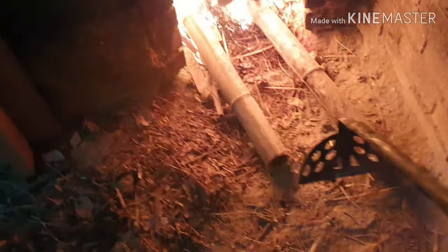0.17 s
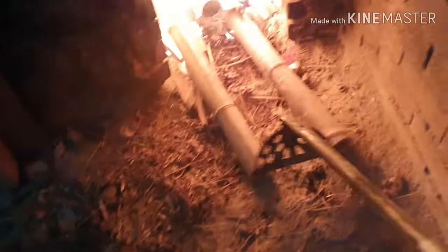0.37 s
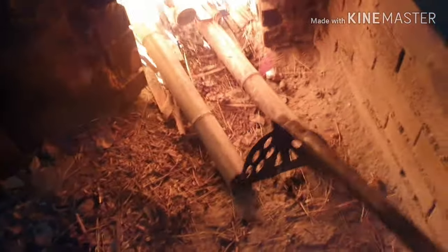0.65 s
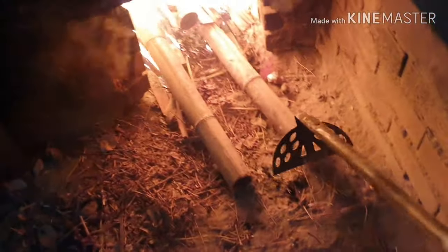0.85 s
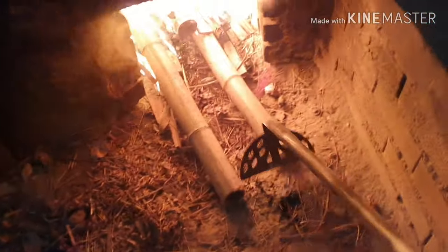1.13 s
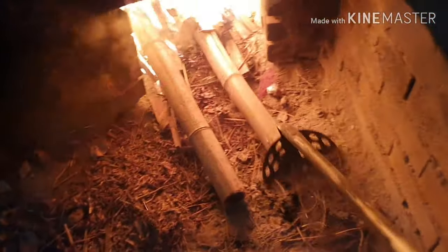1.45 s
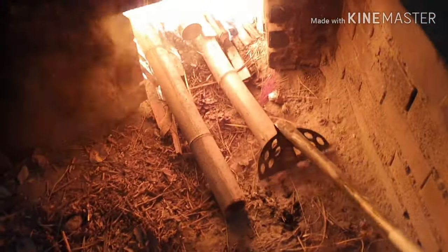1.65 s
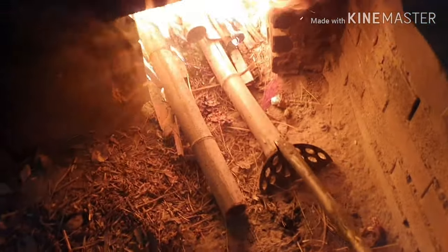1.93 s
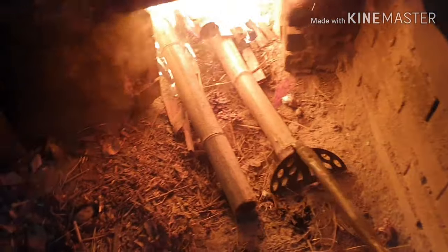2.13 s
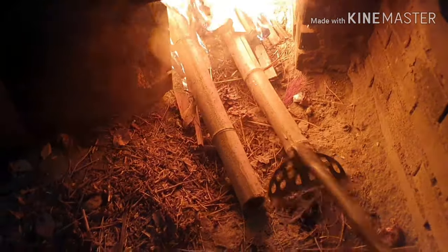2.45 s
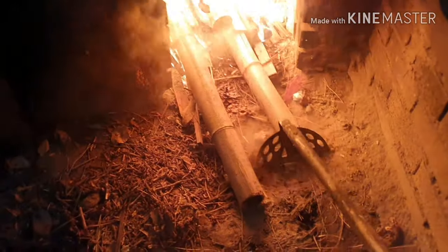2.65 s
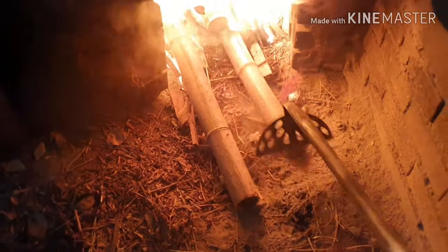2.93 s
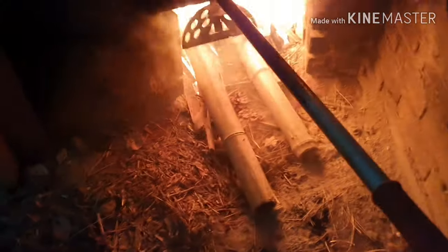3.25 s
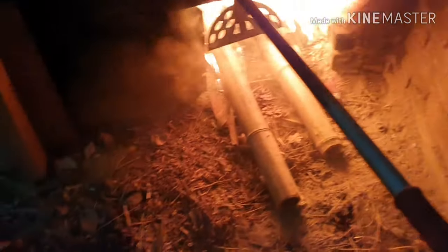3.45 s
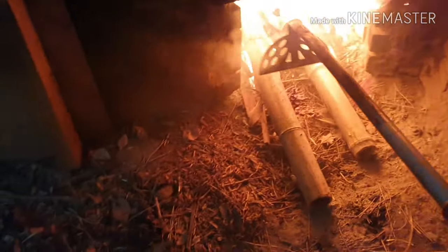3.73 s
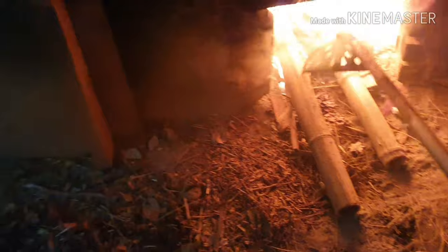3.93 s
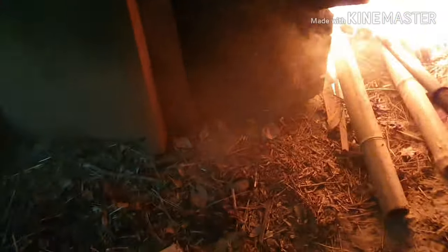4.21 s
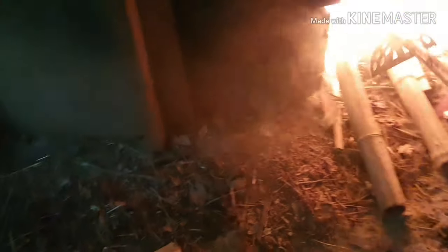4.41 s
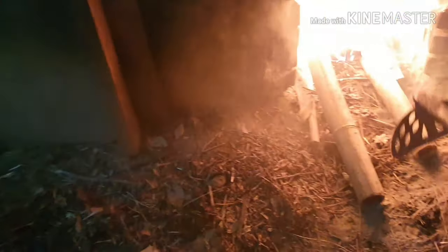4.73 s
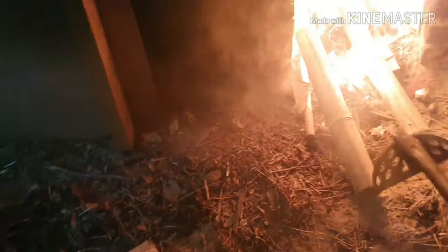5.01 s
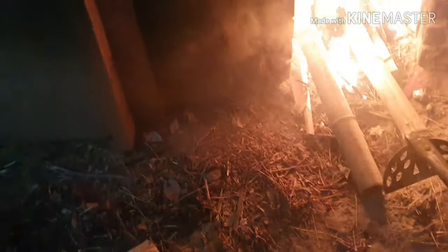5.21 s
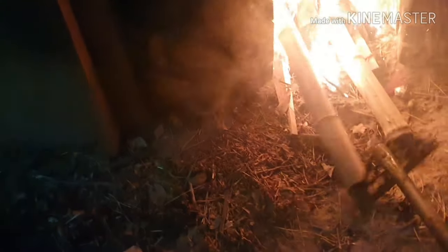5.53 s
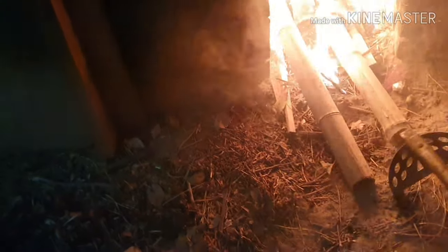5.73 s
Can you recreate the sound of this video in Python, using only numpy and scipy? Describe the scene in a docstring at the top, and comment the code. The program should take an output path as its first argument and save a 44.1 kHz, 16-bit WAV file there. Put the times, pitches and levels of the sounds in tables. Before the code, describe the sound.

Bamboo poles burning in a brick firebox crack and pop sharply at irregular moments, with hollow knocks, over low fluttering flames and faint hissing steam.

```python
"""Bamboo poles burn in the mouth of a brick firebox while an iron rake shoves them in.
The poles crack in clusters of snapping fibres, made of shaped grainy noise coloured by the cane.
Knocked poles hoot and thump low and the rake blade tinkles, all as decaying sines; hard walls answer by convolution.
Underneath, filtered noise gives rumbling flames, hissing steam and fizzing sap, and short noise pulses tick as embers."""
import sys
import numpy as np
from scipy import signal
from scipy.fft import rfft, irfft, next_fast_len
from scipy.io import wavfile
from scipy.ndimage import uniform_filter1d

SR = 44100
rng = np.random.default_rng(int(sys.argv[2]) if len(sys.argv) > 2 else 0)


def generate_wav(signal):
    """Clip the signal to [-1, 1] and save it as 16-bit WAV at the path in sys.argv[1]."""
    frames = np.transpose(np.atleast_2d(signal))
    scaled = np.clip(frames, -1, 1) * 32767
    pcm = np.round(scaled).astype(np.int16)
    wavfile.write(sys.argv[1], SR, pcm)


N = 258426
TIME = np.arange(N) / SR  # s
# likeness of left and right at the microphones: pitch_hz, correlation (-1 to 1)
LIKENESS = [(25, 0.7), (60, 1), (150, 0.96), (280, 0.88), (550, 0.73), (1100, 0), (2200, 0.059), (16000, 0)]


def cracks():
    """Splitting poles: each crack is a dense burst of fibre snaps."""
    # cracks of the poles: start_s, swell_s (time scale), level_db, pitch_hz (of the splitting cane),
    # treble_fall_db_per_octave
    crack_rows = [(.2662, .009, -12.5, 1134, 9.5), (.2887, .0038, -21, 2600, 4),
                  (.3057, .015, -21, 1200, 7.5), (.3284, .0056, -19, 1650, 3.5),
                  (.8975, .0053, -7, 1233, 7.2), (.9172, .021, -25, 806, 3.5),
                  (.9553, .0032, -15.5, 810, 3), (1.0028, .006, -23, 835, 3.5),
                  (1.2519, .0026, -17.5, 10000, 0), (1.441, .0059, -13.5, 1520, 4),
                  (1.4496, .0088, -14.5, 3300, 0.5), (1.4806, .0094, -13, 1080, 7.5),
                  (1.5194, .0086, -23, 1020, 1.5), (1.8115, .005, -38.5, 1100, 1.5),
                  (2.4874, .009, -25, 1410, 2.5), (2.5124, .0059, -11.5, 1630, 4),
                  (2.5328, .0066, -12, 1035, 7), (2.9865, .005, -8.5, 1090, 5),
                  (3.0175, .0057, -17, 960, 3.5), (3.055, .0091, -29, 4160, 7.5),
                  (3.2632, .0043, -25, 1100, 3.5), (4.036, 0.006, -12.5, 3520, 6.5),
                  (4.037, .02, -17, 665, 6.5), (4.0745, .003, -10.5, 815, 4.5),
                  (4.2874, .0063, -32, 290, 4.5), (4.4809, .0033, -25.5, 550, 9),
                  (4.4938, .0028, -26.5, 1650, 10), (4.8265, .0057, -38, 250, 2.5),
                  (5.063, .0052, -11.5, 1480, 6), (5.531, .004, -10, 1430, 9.5),
                  (5.5451, .015, -18.5, 4500, 2.5)]
    return swarms(crack_rows, softness=0.6, grain_db=5.5, alike=0.33, evenness=0.62)


def scrapes():
    """Drawn-out scrapes and spurts: gentler bursts whose level wavers quickly."""
    # scrapes and spurts: start_s, swell_s (time scale), level_db, pitch_hz, treble_fall_db_per_octave
    scrape_rows = [(1.2531, 0.03, -31.5, 3600, 0), (1.7599, 0.035, -45.5, 890, 4),
                   (1.81, 0.18, -55.5, 10000, -1), (3.5563, .045, -41, 610, 0.15),
                   (3.9179, 0.043, -39, 470, 4), (4.22, 0.068, -53, 7000, -2),
                   (4.49, .023, -39.5, 2800, 5.5), (4.5095, 0.078, -44, 560, 2),
                   (5.497, 0.029, -25.5, 1370, .6)]
    swarm = swarms(scrape_rows, softness=1.0, grain_db=3.0, alike=0.22, evenness=0.46)
    return swarm * from_db(1.64 * drift(rate=150))


def swarms(rows, softness, grain_db, alike, evenness):
    """One burst for each row."""
    out = np.zeros((2, N))
    for start_s, *row in rows:
        add(out, start_s, burst(row, softness, grain_db, alike, evenness))
    return out


def burst(row, softness, grain_db, alike, evenness):
    """A swarm of fibre snaps swells and stops; the pole gives it its colour, strongest near the pitch of the cane."""
    # broad resonances of the poles in the firebox mouth: pitch_hz, level_db (per third octave)
    pole_resonances = [(60, -35), (120, -11), (200, -5.5), (320, -8), (450, -8), (660, -4), (1000, -9.5),
                       (1400, -8), (2200, -6), (4400, -7), (7500, -7), (11000, -5), (16000, -7)]
    usual_air_hz, air_scatter_octaves = 675, 0.15
    swell_s, level_db, pitch_hz, treble_fall = row
    swell_s = max(swell_s, .001)
    size = 2 * next_fast_len(int((2 * swell_s + .03) * SR))

    u = np.arange(size) / SR / swell_s
    shape = (u * u / softness) ** (softness / 2) * np.exp((softness - u * u) / 2)
    grains = from_db(grain_db * np.minimum(rng.exponential(1, size), 5))
    snaps = rfft(shape * rng.standard_normal((2, size)) * grains)
    # a snap has no pitch: its energy is spread fairly evenly over all frequencies
    even_snaps = irfft(snaps / np.abs(snaps) ** min(evenness, 1))
    snaps = rfft(even_snaps * shape ** 0.2)
    snaps = snaps / np.sqrt(np.mean(np.abs(snaps) ** 2, axis=1, keepdims=True))

    hz = np.maximum(np.arange(size // 2 + 1) * SR / size, 10)
    colour = from_db(level_db - skirts_db(hz, pitch_hz, treble_fall) + at_hz(pole_resonances, hz))
    air_hz = usual_air_hz * 2 ** (air_scatter_octaves * rng.normal())
    colour = colour * woody(hz, air_hz, pitch_hz, boost_db=4.5, width=0.05, upper_db=-8)
    # width of a third octave as a share of the whole band
    third_octave = (2 ** (1 / 6) - 2 ** (-1 / 6)) * hz / (SR / 2)
    pair = widen(snaps, np.maximum(alike, at_hz(LIKENESS, hz)))
    return irfft(pair * causal(colour / np.sqrt(third_octave))) * np.linalg.norm(shape)


def skirts_db(hz, pitch_hz, treble_fall, flat_above_hz=10000):
    """Loss on either side of a burst's pitch, steady per octave; the bass loss has a limit."""
    bass_fall_db_per_octave, bass_limit_db = 8, 23.5
    octaves = np.log2(np.minimum(hz, flat_above_hz) / pitch_hz)
    bass_loss_db = np.minimum(-bass_fall_db_per_octave * octaves, bass_limit_db)
    return np.where(octaves > 0, treble_fall * octaves, bass_loss_db)


def woody(hz, air_hz, wall_hz, boost_db, width, upper_db):
    """Cane favours the pitch of its air column and the bending modes of its wall; the local average stays level."""
    modes = [(air_hz, 0), (wall_hz, 0), (1.54 * wall_hz, upper_db), (3.4 * wall_hz, upper_db)]
    power = 1
    for centre_hz, mode_db in modes:
        power = power + from_db(boost_db + mode_db) ** 2 / (1 + ((hz / centre_hz - 1) / width) ** 2)
    octaves = np.linspace(np.log2(hz[0]), np.log2(hz[-1]), num=440)
    local_power = uniform_filter1d(np.interp(octaves, np.log2(hz), power), size=50)
    return np.sqrt(power / np.interp(np.log2(hz), octaves, local_power))


def causal(gain):
    """The minimum-phase response with these gains: it never sounds before its cause."""
    cepstrum = irfft(np.log(gain))
    half = len(cepstrum) // 2
    return np.exp(rfft(np.r_[cepstrum[0], 2 * cepstrum[1:half]], len(cepstrum)))


def hoots(third_db, rise):
    """Each hoot or thump rings at its pitch and, faintly, at three times that, as a tube closed at one end does."""
    # hoots and low thumps of the knocked poles: start_s, pitch_hz, level_db
    hoot_rows = [(.267, 554, -7), (.27, 429, -16.5), (.899, 1250, -4), (.908, 267, -22.5),
                 (1.067, 500, -16.5), (1.483, 730, -6), (1.778, 520, -37), (2.534, 597, -9),
                 (2.533, 278, -20), (2.988, 1146, -12), (3.018, 263, -21.5), (3.561, 610, -34.5),
                 (3.923, 453, -22), (4.04, 190, -26), (4.072, 811, -4.5), (4.288, 418, -28),
                 (4.494, 534, -17), (4.826, 1115, -23.5), (4.84, 164.7, -31.5), (5.065, 1355, 3.5),
                 (5.067, 458, -5), (5.504, 295, -23.5), (5.5337, 419, -5.5), (5.536, 296, -14.5),
                 (5.551, 503, -8), (5.577, 443, -16.5), (5.655, 500, -17), (5.713, 472, -24.5),
                 (5.742, 264, -29)]
    cycles_to_60_db_down = 25.4
    out = np.zeros((2, N))
    for start_s, hz, level_db in hoot_rows:
        t60 = cycles_to_60_db_down / hz
        hoot = ring(hz, t60, rise) + from_db(third_db) * ring(3 * hz, t60, rise)
        add(out, start_s, from_db(level_db) * hoot)
    return out


def blade(spread_db, rise):
    """The rake's iron rings in all its modes at each touch, with a strength of its own on either side."""
    # touches of the rake blade: start_s, level_db, brightness_db_per_octave (about 8 kHz)
    touches = [(1.448, -27, -1.5), (1.766, -52.5, -1), (1.812, -51.5, -2.5), (2.1, -57, -7),
               (2.487, -41.5, 11), (3.017, -42, -5.5), (5.515, -30.5, 10), (5.548, -35, 4)]
    # modes of the perforated iron blade: pitch_hz, level_db, t60_s
    blade_modes = [(2716, -2.5, 0.27), (3230, -16, .18), (4640, -13, 0.13), (6140, 1, .2),
                   (7400, -15, 0.19), (8500, -1, 0.39), (8506, -16, 0.27), (9781, 1, 0.19),
                   (10740, 1, 0.17), (11300, -7, .16), (11640, 6.5, 0.16), (12650, 0, 0.16),
                   (14100, -1, .17), (15050, -11, .15)]
    out = np.zeros((2, N))
    for start_s, level_db, bright_db in touches:
        for hz, mode_db, t60 in blade_modes:
            strength_db = level_db + mode_db + bright_db * np.log2(hz / 8000)
            for side in out:
                strength = from_db(strength_db + spread_db * rng.normal())
                add(side, start_s, strength * ring(hz, t60, rise))
    return out


def ring(hz, t60, rise):
    """A sine that takes a moment (rise, s) to build up and loses 60 dB in t60 seconds."""
    t = TIME[:SR // 2]
    sine = np.sin(2 * np.pi * (hz * t + rng.random()))
    return sine * from_db(-60 * t / t60) * (1 - np.exp(-(t / rise) ** 2))


def embers(tick_db, decay, per_s, faint_db):
    """Tiny bright ticks, a few clear ones among many faint ones: decaying pulses (decay, s) gate noise."""
    # the clearest ember ticks: start_s, level_db (before tick_db is added)
    clear_ticks = [(.0964, -43.5), (.138, -40), (.7976, -56), (1.731, -37), (2.8355, -42), (4.793, -37),
                   (5.349, -35.5), (5.3762, -40)]
    # colour of a tick: pitch_hz, level_db (relative, per Hz)
    tick_colour = [(1000, -15), (3000, -6.5), (6000, -11), (10000, -2.5), (16000, -2)]
    kicks = (rng.random(N) < per_s / SR) * from_db(faint_db + 4 * rng.standard_normal(N))
    for start_s, level_db in clear_ticks:
        add(kicks, start_s, from_db([level_db + tick_db]))
    envelope = signal.lfilter([1], [1, -np.exp(-1 / (decay * SR))], kicks + 1e-18)
    return envelope * coloured_noise(tick_colour)


def from_the_right(x, lag_s, pan_db):
    """The sound reaches the left side later and weaker."""
    left = np.interp(TIME - lag_s, TIME, x[0]) * from_db(-pan_db)
    return np.array([left, x[1] * from_db(pan_db)])


def walls(x, build, grain_db, shift_rate):
    """The listener moves and the hot air stirs, so one pattern of echoes keeps giving way to another."""
    turn = 2 * np.pi * shift_rate * TIME
    right = x[1:]
    first = signal.fftconvolve(right, echo(build, grain_db), axes=1)[:, :N]
    second = signal.fftconvolve(right, echo(build, grain_db), axes=1)[:, :N]
    return np.cos(turn) * first + np.sin(turn) * second


def echo(build, grain_db):
    """Reflections thicken within a few milliseconds, then die away at each band's own rate."""
    # decay of the wall echo: pitch_hz, t60_s
    wall_t60 = [(200, 0.49), (560, 0.3247), (1400, 0.4), (3600, 0.3772), (10000, 0.29)]
    # strength of the wall echo: pitch_hz, level_db (against the sound sent to the walls)
    wall_db = [(200, 0.8), (560, -0.5), (1400, -1), (3600, -2.5), (10000, -3.5)]
    edges = 22 * 2 ** (np.arange(30) / 3)  # third-octave bands, Hz
    t = TIME[:int(.7 * SR)]
    # the grain of separate reflections smooths out with time
    sparse = from_db(grain_db * np.exp(-t / 0.34) * np.minimum(rng.exponential(1, len(t)), 5))
    even_sparse = sparse / np.sqrt(uniform_filter1d(sparse ** 2, size=400))
    white = rng.standard_normal((2, 2, len(t))) * even_sparse
    out = 0
    for k, (low, high) in enumerate(zip(edges, edges[1:])):
        hz = np.sqrt(low * high)
        bandpass = signal.butter(2, (low, high), "band", fs=SR, output="sos")
        # neighbouring bands take unrelated noise
        band = widen(signal.sosfilt(bandpass, white[k % 2]), at_hz(LIKENESS, hz))
        band = band * from_db(-60 * t / at_hz(wall_t60, hz)) * (1 - np.exp(-t / build))
        share = 2 * (high - low) / SR / len(t)
        out = out + rms_one(band) * np.sqrt(share) * from_db(at_hz(wall_db, hz))
    return out


def fire(flutter_db, sputter_db):
    """Flames rumble and flutter; sap steams and sputters out of the poles: three noises with wavering levels."""
    # level of the flames before their flutter: time_s, level_db
    flame_level = [(0, -48.5), (1.2, -47.5), (1.7, -50), (3.9, -47), (4.25, -41), (4.7, -45), (5.45, -44),
                   (5.72, -38), (5.86, -48)]
    # level of the steam that leaves the poles, before its wavering: time_s, level_db
    steam_level = [(0, -63), (.75, -69.5), (1.2, -48), (1.7, -53), (2.22, -56.5), (2.44, -65.5),
                   (2.8, -51.5), (3.35, -56.5), (4.2, -50), (4.7, -54.5), (5, -62.5), (5.86, -55.5)]
    # colours of flames, steam and fizzing sap: pitch_hz, level_db (relative, per Hz)
    flame_colour = [(20, -28), (40, -9), (62, -2), (85, -3), (125, -5.5), (170, -9.5), (300, -15.5),
                    (500, -20.5), (1000, -27), (2000, -30), (4000, -46), (9000, -69)]
    hiss_colour = [(1000, -4.5), (2500, -8), (3400, -6.5), (4400, -1), (5500, -8.5), (7500, -20.5)]
    fizz_colour = [(4000, -18), (7000, 0), (10000, -0.5), (14500, 0.5), (16000, -0.5)]
    steam_db = in_time(steam_level)
    # sap fizzes along with the steam, with a share of its swing
    usual_fizz_db, fizz_follows = -63, .3
    fizz_db = usual_fizz_db + fizz_follows * (steam_db - steam_db.mean())
    flame_db = in_time(flame_level) + flutter_db * drift(rate=23)
    flame = from_db(flame_db) * coloured_noise(flame_colour)
    steam = from_db(steam_db + 1.7 * drift(rate=5.2)) * coloured_noise(hiss_colour)
    froth = from_db(fizz_db + sputter_db * drift(rate=44)) * coloured_noise(fizz_colour)
    return flame + steam + froth


def coloured_noise(spectrum):
    """Steady stereo noise, rms 1, that falls away below its spectrum and holds the last level above it."""
    size = next_fast_len(N)
    hz = np.maximum(np.arange(size // 2 + 1) * SR / size, 1)
    gain = from_db(at_hz(spectrum, hz)) * np.minimum(hz / spectrum[0][0], 1) ** 2
    pair = widen(rfft(rng.standard_normal((2, size))), at_hz(LIKENESS, hz))
    return rms_one(irfft(pair * gain, size)[:, :N])


def drift(rate):
    """Random wavering: straight lines between random knots of spread 1, rate knots per second."""
    knots = rng.standard_normal(int(rate * N / SR) + 2)
    return np.interp(TIME * rate, np.arange(len(knots)), knots)


def widen(pair, alike):
    """Two unrelated signals become left and right with the given correlation."""
    alike = np.clip(alike, -.99, .99)
    middle = np.sqrt((1 + alike) / 2) * pair[0]
    side = np.sqrt((1 - alike) / 2) * pair[1]
    return middle + side * np.array([[1], [-1]])


def from_db(db):
    """Decibels to amplitude."""
    return 10 ** (np.asarray(db) / 20)


def rms_one(x):
    """Scales a signal to rms 1."""
    return x / np.sqrt(np.mean(x ** 2) + 1e-20)


def at_hz(points, hz):
    """Reads a table on a log-frequency axis."""
    table_hz, values = np.transpose(points)
    return np.interp(np.log(hz), np.log(table_hz), values)


def in_time(curve):
    """Reads a curve at every sample."""
    return np.interp(TIME, *np.transpose(curve))


def add(out, start_s, sound):
    """Mixes a sound in at its start time."""
    start = int(np.clip(round(start_s * SR), 0, N - 1))
    out[..., start:start + sound.shape[-1]] += sound[..., :N - start]


def scene():
    """Bright sounds fill the brick corner; the poles' hoots and thumps and the blade's ring come mostly direct."""
    bright = cracks() + scrapes() + embers(tick_db=-1.5, decay=0.0053, per_s=9.3, faint_db=-60)
    ringing = hoots(third_db=-16.5, rise=0.0018) + blade(spread_db=3, rise=0.0018)
    direct = from_the_right(bright + ringing, lag_s=0.00016, pan_db=0.6)
    to_walls = bright + from_db(-5.5) * ringing
    reflected = walls(to_walls, build=0.0041, grain_db=4.5, shift_rate=2.2)
    return direct + reflected + fire(flutter_db=4, sputter_db=2.8)


def record(dry):
    """Peaks are rounded, then the treble above 16 kHz is cut."""
    top = 0.94
    rounded = top * np.tanh(dry / top)
    return signal.sosfilt(signal.ellip(10, .1, 80, 16000, fs=SR, output="sos"), rounded)


dry = scene()
out = record(dry)
generate_wav(out)
```